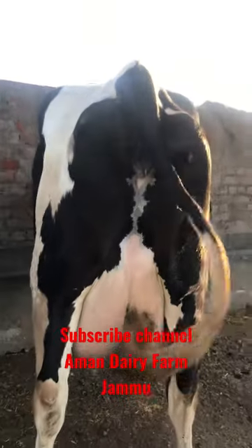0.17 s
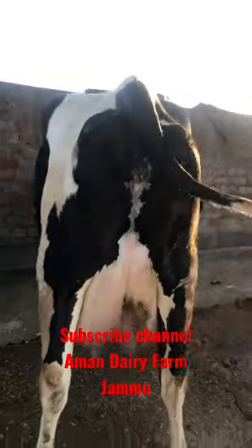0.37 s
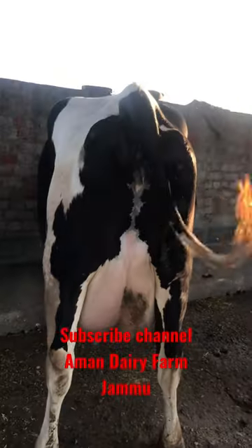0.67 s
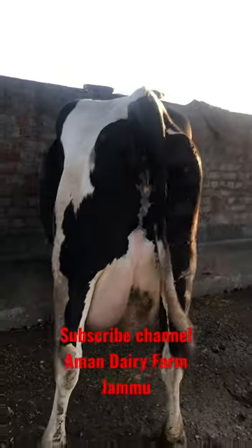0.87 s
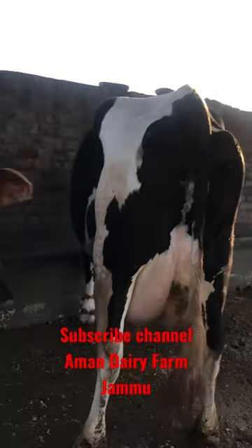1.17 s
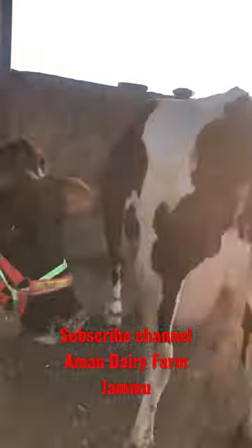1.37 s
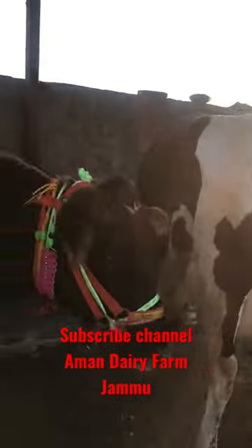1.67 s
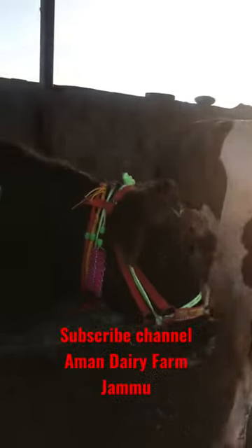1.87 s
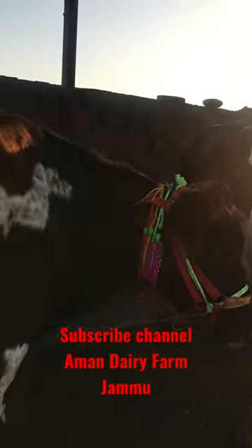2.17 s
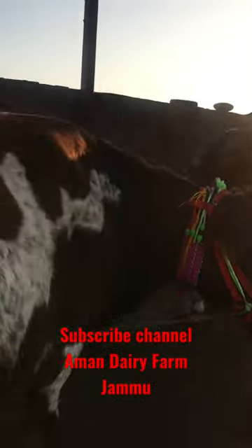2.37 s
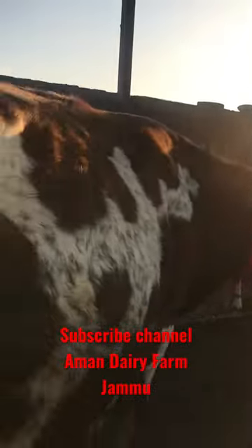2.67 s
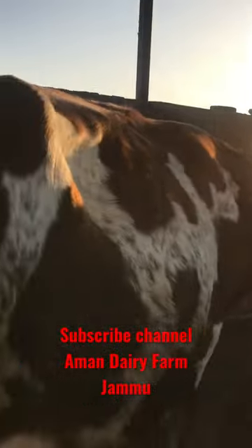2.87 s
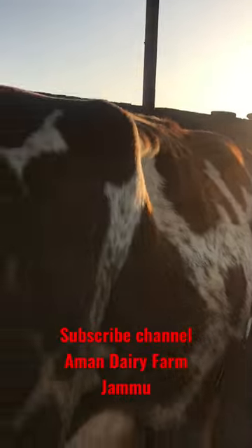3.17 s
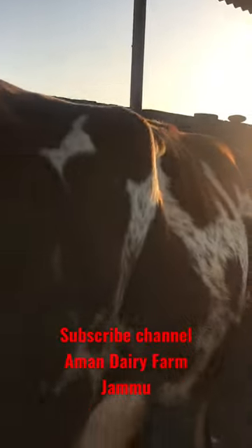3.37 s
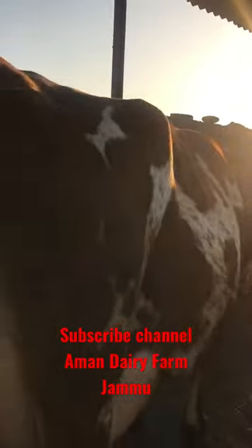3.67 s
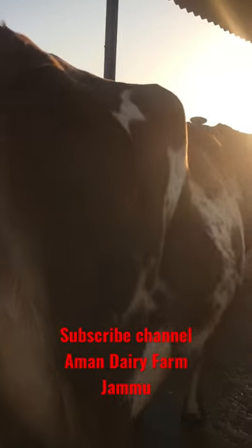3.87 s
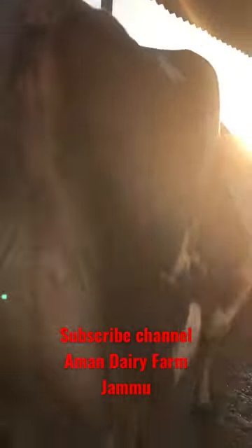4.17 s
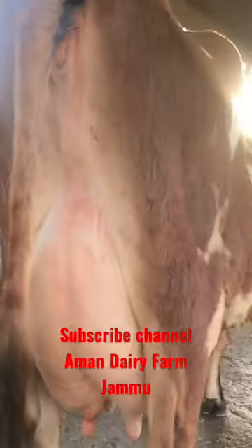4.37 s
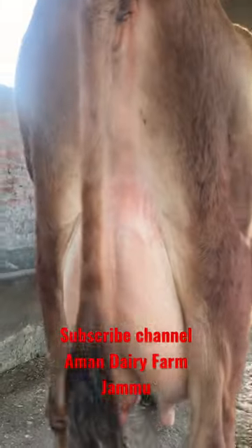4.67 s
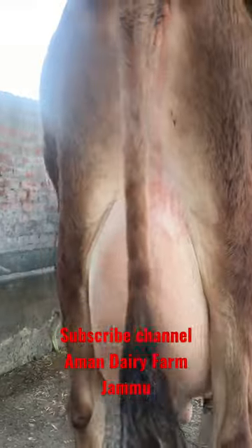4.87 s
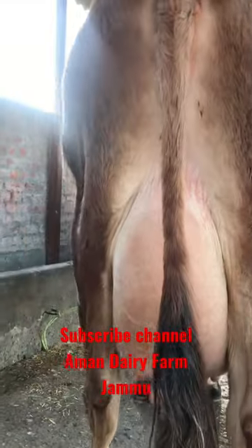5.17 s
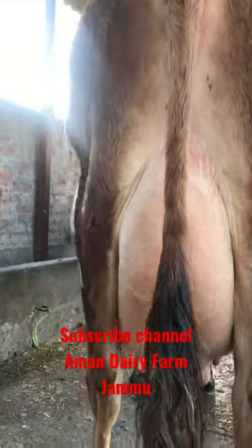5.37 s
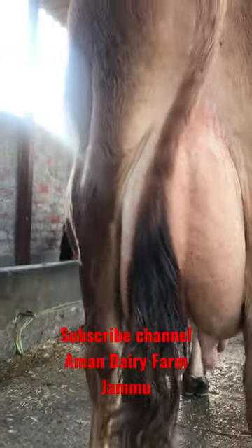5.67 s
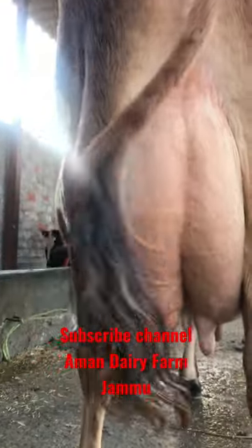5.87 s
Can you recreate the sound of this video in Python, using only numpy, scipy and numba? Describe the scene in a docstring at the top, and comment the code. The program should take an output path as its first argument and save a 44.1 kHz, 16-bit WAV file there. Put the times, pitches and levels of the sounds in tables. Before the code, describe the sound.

Quiet outdoor air and a couple of light scuffs, then a loud close cow moo of about a second and a half, rising slightly and breaking downward. Low bumps knock the microphone under it. Nearly two seconds of calm with small ticks follow, then another nasal, brassy moo holds steadily until the sound stops abruptly. The pen adds short reverberation.

```python
"""In a brick-walled farm pen a cow moos twice, close by: each call starts hoarse and clears to a brassy tone;
the first roughens and falls steeply in pitch at its end, the second is cut off while still sounding.
Vocal pulses and breath noise ring gliding resonances; drifting delayed copies and the pen's ring colour them.
Bursts of noise make scuffs and ticks, damped low sines bump the microphone, narrow noise makes faint
tones, and coloured noise makes the quiet yard."""
import sys
import numpy as np
from scipy import signal
from scipy.fft import rfft, irfft, next_fast_len
from scipy.io import wavfile
from scipy.ndimage import uniform_filter1d, map_coordinates
from numba import njit

SR = 44100
rng = np.random.default_rng(int(sys.argv[2]) if len(sys.argv) > 2 else 0)


def wav_out(sig):
    """Save sig, one row per channel (or a flat mono array), as 16-bit PCM at SR to the path in sys.argv[1]."""
    wavfile.write(sys.argv[1], SR, np.round(np.clip(np.atleast_2d(sig).T, -1, 1) * 32767).astype(np.int16))


N = 264820

# The calls: start_s, creak_s (before the full voice), attack_s, end_s (the second lies past the last sample),
#   opening_hoarseness (0-1, added), second_resonance_hz (at the start), glide_hz_per_s, treble_growth_db_per_s
CALLS = [(1.246, 0.037, 0.089, 2.675, .42, 1327, 109, 2.5), (4.47, 0.0061, 0.1, 6.15, 0.61, 1408, -79, -2)]
# Pitch of the vocal folds, one list a call: time_s, pitch_hz
PITCH = [
    [(1.25, 104.3), (1.288, 124), (1.316, 129.2), (1.374, 134.6), (2.178, 146.8), (2.532, 148.1),
     (2.578, 145), (2.614, 130.5), (2.642, 108), (2.65, 105.9)],
    [(4.49, 109.9), (4.514, 121), (4.564, 131.1), (4.598, 133.2), (4.754, 136.1), (5.01, 138.4),
     (5.14, 138), (5.544, 134.9), (5.75, 134), (6.0, 131.1)],
]
# First resonance, which drifts generally upward with jumps as different overtones become strongest,
#   one list a call: time_s, centre_hz, level_db
FIRST_RESONANCE = [
    [(1.37, 523, -27), (1.506, 547, -20.5), (1.654, 566, -25), (1.696, 659, -26.5), (1.752, 590, -22.5),
     (1.928, 589, -19), (1.996, 610, -30.5), (2.372, 615, -19), (2.574, 665, -31), (2.635, 605, -21)],
    [(4.57, 530, -26.5), (5.016, 576, -26.5), (5.094, 600.6, -23.5), (5.246, 580, -28.5),
     (5.302, 677, -18.5), (5.51, 669, -22), (5.808, 570, -28.5), (5.836, 664, -23.5), (5.936, 662, -15.5),
     (6.0, 655, -22)],
]
# Level of the second resonance, one list a call: time_s, level_db
SECOND_LEVEL = [
    [(1.37, -25.5), (1.752, -23), (1.802, -16), (1.914, -22), (1.96, -17), (2.538, -20), (2.56, -28),
     (2.635, -24)],
    [(4.57, -26), (4.608, -30.5), (4.808, -16), (5.146, -28.5), (5.45, -18.5), (5.712, -23.5),
     (5.868, -15.5), (6.0, -23)],
]
# Levels of the third and fourth resonances, one list a call: time_s, third_db, fourth_db
BRASSY_LEVELS = [
    [(1.37, -24.5, -29.5), (1.472, -30.5, -33), (1.616, -23, -24), (1.912, -26.5, -25), (2.056, -20, -31.5),
     (2.224, -34, -23.5), (2.352, -20, -32.5), (2.426, -28, -35), (2.506, -23.5, -28.5), (2.635, -35, -32)],
    [(4.57, -29.5, -28.5), (4.724, -29.5, -31), (4.876, -19, -20), (5.17, -24, -32), (5.282, -25, -23),
     (5.41, -34, -34.5), (5.498, -28.5, -29), (5.752, -29.5, -31.5), (5.976, -33, -24.5), (6.0, -27, -27)],
]
# Nasal resonance, which swells and fades once a call: centre_hz, top_db, top_s (from the call's start),
#   slope_db_per_s (rise and fall)
NASAL = [(845, -28.5, 0.51, 14.5), (1050, -28, 0.92, 6.5)]
# Hum of the chest, harmonics 1-3, one list a call: start_db, change_db_per_s
CHEST = [
    [(-66, 12.5), (-44.5, -7), (-29.5, -8.5)],
    [(-48, -0.5), (-48, 0.5), (-45, 6)],
]
# High throat resonances before stretching, in three bands: centre_hz, width_hz, relative_db
RASP = [(3267, 580, -1), (3960, 700, -2.5), (4384, 470, -.7)]
EDGE = [(5400, 230, 2.5), (6275, 240, -1.5)]
SIZZLE = [(7240, 300, 0.0052), (8360, 340, 0.0099), (9110, 270, -1.4), (9900, 520, -1.8),
          (11370, 660, 0.35), (12260, 410, 0), (13700, 600, -2)]
# Filters on the voice and its treble: frequency_hz, gain_db
MOUTH_FILTER = [(250, -30.0), (430, -7.0), (520, 7.0)]
AIRY_FILTER = [(1200, -20), (3000, 0)]
TREBLE_FILTER = [(3500, -21.5), (5200, -1.5)]
RASP_FILTER = [(4400, -2), (4900, -6.0)]
# Drifting delayed copies of the voice, one list a call: delay_s (at its start), drift_s_per_s, gain
DELAYED_COPIES = [
    [(0.00915, -0.00087, 0.41), (0.00961, -0.00075, 0.1), (0.00766, -0.00086, 0.33),
     (0.02179, -0.00121, 0.27)],
    [(0.001505, 4e-05, 0.19), (0.01681, 0.00102, 0.36), (0.01113, -0.00044, 0.18), (0.01, -0.0004, 0.14)],
]
# Reverberation time of the pen: frequency_hz, t60_s
PEN_DECAY = [(150, 0.34), (600, 0.83), (1500, 0.69), (3500, 0.48), (12000, 0.14)]
# Scuffs and ticks: start_s, level_db (before rise and decay), centre_hz, width_hz, rise_s, t60_s
SCUFFS = [(0.234, -31, 1100, 600, .002, 0.029), (0.252, -30.5, 1050, 613, .0005, 0.045),
          (.375, -46, 2130, 1480, 0.0075, 0.66), (.39, -40.5, 567, 400, 0.037, 0.56),
          (.8, -46, 450, 400, 0.022, 0.44), (2.834, -36.5, 3380, 1400, 0.00062, 0.048),
          (3.371, -47, 1390, 700, 0.01, 0.22), (3.505, -48, 645, 120, .004, .12),
          (4.195, -45, 895, 904, 0.0072, .15), (4.372, -44, 5000, 5075, 0.0011, 0.02),
          (4.378, -49, 590, 197.9, 0.0069, 0.45)]
# Bumps on the microphone: start_s, level_db (5.5 dB under the undamped sine's peak), pitch_hz
THUMPS = [(1.821, -35, 89.14), (1.862, -28, 109), (1.921, -29, 110), (1.962, -27, 99), (1.976, -30, 65)]
# Faint tones: centre_s, top_db, pitch_hz, spread_s (standard deviation of the bell envelope)
FAINT_TONES = [(.1, -54, 602, 0.21), (0.642, -47.5, 1037, 0.037), (0.652, -56, 594, 0.17)]
# Spectrum of the yard air: frequency_hz, relative_db
YARD_SPECTRUM = [(15, -38), (25, 1.5), (71, -3), (164, -6.5), (233, -10), (267, -13.5), (378, -15),
                 (536, -16), (581, -12.5), (702, -17), (1660, -18), (2290, -17.5), (5870, -21),
                 (15500, -37)]
# Middle range of the yard, its spectrum: frequency_hz, relative_db; and its level: time_s, level_db
STIR_SPECTRUM = [(120, -23), (280, -2.5), (700, -8.5), (2500, -12), (8000, -35), (15000, -64)]
STIR_LEVEL = [(0, -55.5), (.7, -54), (1.3, -54.5), (3, -62.5)]

CREAK_DB, RELEASE_S = -25.5, 0.045  # the creak relative to the full voice; the fall at a call's end
CLEAR, CLEARS_S = 0.025, 0.053  # hoarseness of the held tone (0-1); spread of its bell-shaped settling
# roughening: begins this long before a call's end, takes this long, adds this hoarseness
BREAK_S, BREAK_RISE_S, BREAK_HOARSE = 0.1502, 0.091, 0.436
OVERLAP_DB = -0.1  # the three brassy resonances overlap, so each needs a little less
CHEST_LEAD = 0.73  # the hum grows as this power of the breath, ahead of the rest
RASP_DB, EDGE_DB, SIZZLE_DB = -32.3, -49.3, -55.8  # base levels, before growth, swell and bite
TREBLE_LAG, TREBLE_RELEASE_S = 1.3, 0.1  # power of the breath; the treble is the first to fade
BITE_DB, BITE_S = 9, .2  # extra edge at a call's start; its time constant
RASP_STRETCH = 2.5  # the rasp shifts further than other high resonances, by this power
SWELL_HZ = (138, 144)  # edge and sizzle swell as the pitch is pushed through this range
EDGE_SWELL_DB, SIZZLE_SWELL_DB = 2.5, 3.5
YARD_DB, PEN_DB = -50.5, -11.5  # the pen's ring is relative to the direct sound
TOP_HZ = 15700


def cow():
    """Source and filter: breath drives vocal pulses, which ring chest, throat and mouth."""
    age, left, which = calls()
    _, creak_s, attack_s, _, first_hoarse, start_hz2, glide, growth = np.array(CALLS)[which].T
    pitch, = curves(np.vstack(PITCH))

    creak = amp(CREAK_DB) * ramp(age, 0.0034)
    full_voice = ramp(age - creak_s, attack_s)
    breath = np.maximum(creak, full_voice) * ramp(left, RELEASE_S)

    opening = first_hoarse * np.exp(-(age / CLEARS_S) ** 2 / 2)
    breaking = BREAK_HOARSE * ramp(BREAK_S - left, BREAK_RISE_S)
    hoarse = CLEAR + opening + breaking

    jitter = .05 * hoarse * wobble(170) + 0.0008 * wobble(25.09)
    phase = 2 * np.pi * np.cumsum(pitch * (1 + jitter)) / SR
    shimmer = amp(1.34 * hoarse * wobble(110))

    hz2 = start_hz2 + glide * age
    # all high resonances shift with the second as the neck stretches
    stretch = (hz2 / 1400) ** 0.24
    hum = breath ** CHEST_LEAD * chest(phase)
    body = hum + breath * throat(phase, hoarse, hz2, stretch)
    force = breath ** TREBLE_LAG * ramp(left, TREBLE_RELEASE_S) * amp(growth * age)
    return shimmer * (body + force * treble(phase, hoarse, pitch, stretch))


def larynx(phase, air):
    """Glottal excitation: one sharp pulse a cycle, mixed with air noise that puffs in time with it."""
    cycle = np.floor(phase / (2 * np.pi))
    at = np.interp(2 * np.pi * np.arange(1, cycle[-1]), phase, np.arange(N))
    # a windowed sinc places each pulse between samples
    taps = np.floor(at).astype(int)[:, None] + np.arange(-7, 9)
    offset = taps - at[:, None]
    kernel = np.sinc(offset) * np.cos(np.pi * offset / 16) ** 2
    pulses = np.bincount(np.clip(taps, 0, N - 1).ravel(), kernel.ravel(), N)
    puffs = rng.standard_normal(N) * (1 + 0.25 * np.cos(phase))
    air = np.clip(air, 0, 1)
    return np.sqrt(1 - air ** 2) * unit(pulses) + air * unit(puffs)


def chest(phase):
    """Harmonic series: the first three harmonics of the pitch, each changing steadily in level."""
    age, _, which = calls()
    hum = np.zeros(N)
    for k, (db, change) in enumerate(np.moveaxis(CHEST, 0, -1), start=1):
        hum += amp(db[which] + change[which] * age) * np.sin(k * phase)
    return np.sqrt(2) * hum


def throat(phase, hoarse, hz2, stretch):
    """Formants: resonances of throat, nose and mouth select bands of the voice and its delayed copies."""
    age, _, which = calls()
    hz1, db1 = curves(np.vstack(FIRST_RESONANCE))
    db2, = curves(np.vstack(SECOND_LEVEL))
    db3, db4 = curves(np.vstack(BRASSY_LEVELS))
    nasal_hz, top_db, top_s, slope = np.array(NASAL)[which].T
    nasal_db = top_db - slope * np.abs(age - top_s)

    # the mouth radiates what lies above the chest's hum
    source = coloured(larynx(phase, 0.72 * hoarse), MOUTH_FILTER)
    source = source + delayed_copies(source)
    first = amp(db1) * steady(resonance(source, hz1, width_hz=97, skirt_hz=477))
    nasal = amp(nasal_db) * steady(resonance(source, nasal_hz, width_hz=132, skirt_hz=256))
    second = amp(db2) * steady(resonance(source, hz2, width_hz=107, skirt_hz=454))
    third = amp(db3) * steady(resonance(source, 1935 * stretch, width_hz=104, skirt_hz=475))
    fourth = amp(db4) * steady(resonance(source, 2400 * stretch, width_hz=99, skirt_hz=415))
    # neighbouring high resonances swing in opposite senses, which fills the valleys between them
    return first + nasal + amp(OVERLAP_DB) * (second - third + fourth)


def treble(phase, hoarse, pitch, stretch):
    """Upper formants: an airier voice, scattered in the pen, rings the rasp, edge and sizzle bands."""
    age, _, _ = calls()
    push = np.interp(pitch, SWELL_HZ, [0, 1])
    airy = coloured(larynx(phase, hoarse + .15), AIRY_FILTER)
    bounced = scattered(airy, gain=1.0)
    bright = coloured(bounced, TREBLE_FILTER)

    rasp_source = coloured(bounced, RASP_FILTER)
    rasp = amp(RASP_DB) * upper(rasp_source, RASP, stretch ** RASP_STRETCH, drift=0.017)
    bite = BITE_DB * np.exp(-age / BITE_S)
    edge_db = EDGE_DB + EDGE_SWELL_DB * push + bite + 1.48 * wobble(9.8)
    edge = amp(edge_db) * upper(bright, EDGE, stretch, drift=0.013)
    sizzle_db = SIZZLE_DB + SIZZLE_SWELL_DB * push + 2.1 * wobble(11)
    sizzle = amp(sizzle_db) * upper(bright, SIZZLE, stretch, drift=0.013)
    return rasp + edge + sizzle


def upper(source, modes, stretch, drift):
    """Mode sum: high throat resonances of alternating sign slide a little as tongue and neck move."""
    total = np.zeros(N)
    for k, (hz, width_hz, db) in enumerate(modes):
        centre_hz = hz * (stretch + drift * wobble(4))
        mode = unit(resonance(source, centre_hz, width_hz, 2 * width_hz))
        total += (-1) ** k * amp(db) * mode
    return steady(total)


def scattered(x, gain, count=6):
    """Multipath interference: shifting bodies and walls make each high overtone swell and fade by itself."""
    delays = rng.uniform(.001, .014, count)  # seconds
    bounces = sum(np.interp(clock() - delay - 0.000098 * wobble(2.2), clock(), x) for delay in delays)
    return x + gain * bounces


def delayed_copies(x):
    """Comb filtering: drifting delayed copies of the voice make its overtones strengthen and fade in turn."""
    age, _, which = calls()
    total = np.zeros(N)
    for delay, drift, gain in np.moveaxis(DELAYED_COPIES, 0, -1):
        read_s = clock() - delay[which] - drift[which] * age
        total += gain[which] * np.interp(read_s, clock(), x)
    return total


def pen(x):
    """Reverberation: the roofed pen rings as decaying noise, longest in the low middle range."""
    hz, t, z = signal.stft(rng.standard_normal(SR), SR, nperseg=256)
    decay = amp(-60 * t / along(PEN_DECAY, hz)[:, None])
    tail = signal.istft(z * decay, SR, nperseg=256)[1]
    return signal.fftconvolve(x, tail / np.linalg.norm(tail))[:N]


def scuffs():
    """Friction and impact noise: hooves, tails and halters excite one broad resonance each."""
    out = np.zeros(N)
    for s, db, hz, width_hz, rise, t60 in SCUFFS:
        t = np.maximum(clock() - s, 0)
        grit = unit(resonance(rng.standard_normal(N), hz, width_hz, skirt_hz=3 * width_hz))
        out += grit * (1 - np.exp(-t / rise)) * amp(db - 60 * t / t60)
    return out


def thumps():
    """Damped oscillation: each bump on the microphone is a low sine that falls 26 dB in two cycles."""
    out = np.zeros(N)
    for s, db, hz in THUMPS:
        cycles = np.maximum(clock() - s, 0) * hz
        out += amp(db + 5.5) * np.sin(2 * np.pi * cycles) * np.exp(-1.5 * cycles)
    return out


def tones():
    """Narrow-band noise: the fading ring of an earlier moo, and a faint distant call or squeak."""
    out = np.zeros(N)
    for s, db, hz, spread in FAINT_TONES:
        swell = np.exp(-((clock() - s) / spread) ** 2 / 2)
        tone = steady(resonance(rng.standard_normal(N), hz, width_hz=14, skirt_hz=110))
        out += amp(db) * swell * tone
    return out


def yard():
    """Coloured noise: open-air background, with a middle range that settles between 1.3 and 3 s."""
    air_db = YARD_DB + 0.21 * wobble(4.54)
    air = amp(air_db) * unit(coloured(rng.standard_normal(N), YARD_SPECTRUM))
    stir_db, = curves(STIR_LEVEL)
    stir = coloured(rng.standard_normal(N), STIR_SPECTRUM)
    return air + amp(stir_db) * unit(stir)


def calls():
    """Event timing: seconds into the present call, seconds left of it, and its number, at each sample."""
    start, end = np.array(CALLS)[:, 0], np.array(CALLS)[:, 3]
    # the second call takes over midway through the gap
    which = (clock() > (end[0] + start[1]) / 2).astype(int)
    age = np.clip(clock() - start[which], 0, (end - start)[which])
    left = np.maximum(end[which] - clock(), 0)
    return age, left, which


@njit
def ringing(x, angle, radius):
    """Two-pole resonator: a band-pass whose centre may move."""
    y = np.zeros(len(x))
    for i in range(2, len(x)):
        feedback = 2 * radius * np.cos(angle[i]) * y[i - 1] - radius * radius * y[i - 2]
        y[i] = x[i] - x[i - 2] + feedback
    return y * (1 - radius)


def resonance(x, hz, width_hz, skirt_hz):
    """Cascaded resonators: a peak of the given width, then a second that steepens its skirts."""
    angle = 2 * np.pi * hz / SR * np.ones(N)
    peak = ringing(x, angle, np.exp(-np.pi * width_hz / SR))
    return ringing(peak, angle, np.exp(-np.pi * skirt_hz / SR))


def coloured(x, spectrum, size=8192):
    """Minimum-phase filtering: the folded cepstrum gives a causal filter with the given spectrum."""
    cepstrum = irfft(np.log(amp(along(spectrum, np.fft.rfftfreq(size, 1 / SR)))))
    cepstrum[1:size // 2] *= 2
    cepstrum[size // 2 + 1:] = 0
    return signal.fftconvolve(x, irfft(np.exp(rfft(cepstrum))))[:N]


def wobble(rate):
    """Band-limited fluctuation: a smooth curve through random knots, rate of them a second."""
    coarse = np.linspace(0, N, num=N // 32)
    knots = rng.standard_normal(int(N * rate / SR) + 4)
    return np.interp(np.arange(N), coarse, map_coordinates(knots, [coarse * rate / SR]))


def along(points, hz):
    """Logarithmic frequency scale: interpolates (frequency_hz, value) points."""
    f, v = np.transpose(points)
    return np.interp(np.log(hz + 1), np.log(f + 1), v)


def curves(rows):
    """Linear interpolation in time: one curve for each column after the time."""
    s, *cols = np.transpose(rows)
    return [np.interp(clock(), s, c) for c in cols]


def ramp(t, length):
    """Linear onset: a straight rise from 0 to 1 over the given length."""
    return np.clip(t / length, 0, 1)


def clock():
    """Sampling: the time in seconds at each sample."""
    return np.arange(N) / SR


def amp(db):
    """Decibel scale: level to amplitude gain."""
    return 10 ** (np.asarray(db) / 20)


def unit(x):
    """Mean power: x scaled to rms 1."""
    return x / np.sqrt(np.mean(x ** 2) + 1e-20)


def steady(x):
    """Short-time power: x held near rms 1 from moment to moment."""
    power = uniform_filter1d(uniform_filter1d(x * x, size=900), size=700)
    return x / np.sqrt(np.abs(power) + 1e-14)


def scene():
    """Superposition: cow and scuffs ring the pen, over faint tones, thumps and the yard."""
    near = cow() + scuffs()
    return (near + amp(PEN_DB) * pen(near) + tones() + thumps() + yard())[None]


def record(dry):
    """Band limiting: the microphone cuts the deepest bass, and nothing remains above TOP_HZ."""
    size = next_fast_len(N + SR // 2)
    hz = np.fft.rfftfreq(size, 1 / SR)
    low_cut = hz ** 2 / np.sqrt(hz ** 4 + 45 ** 4)
    return irfft(rfft(dry, size) * low_cut * (hz < TOP_HZ), size)[:, :N]


dry = scene()
out = record(dry)
wav_out(out)
```